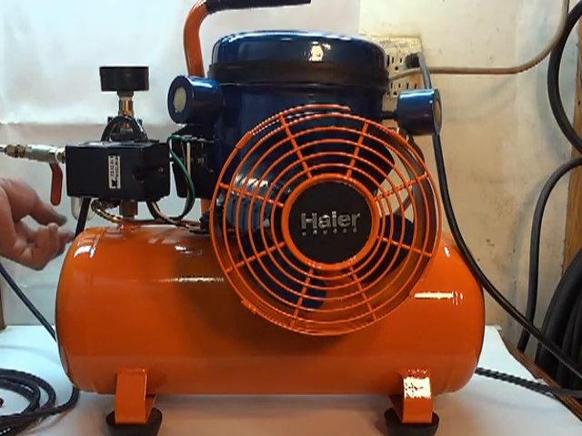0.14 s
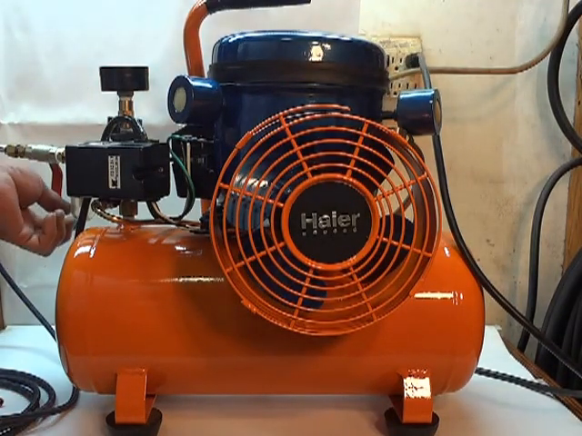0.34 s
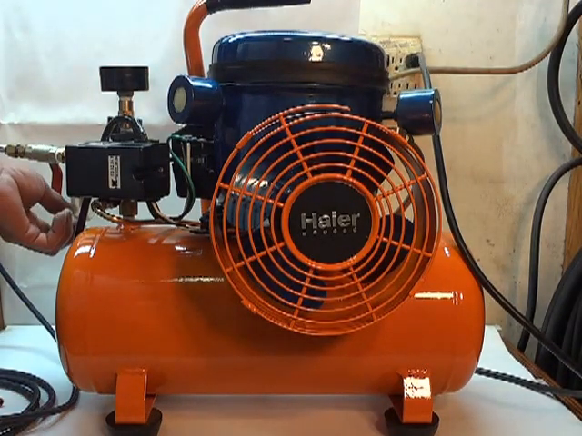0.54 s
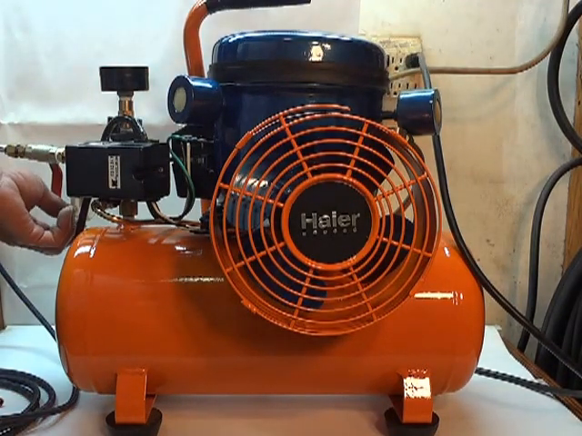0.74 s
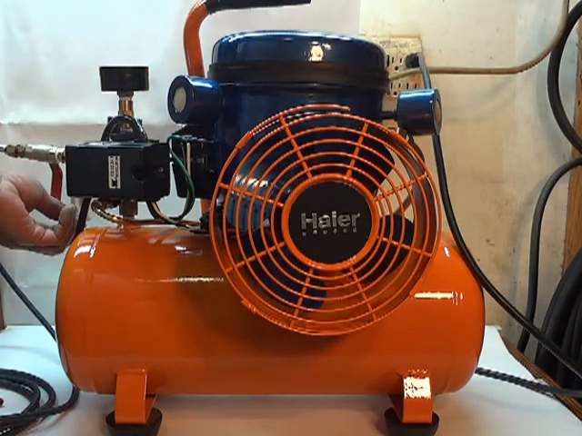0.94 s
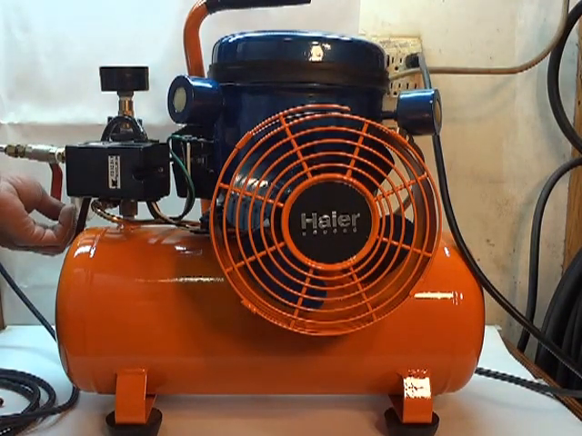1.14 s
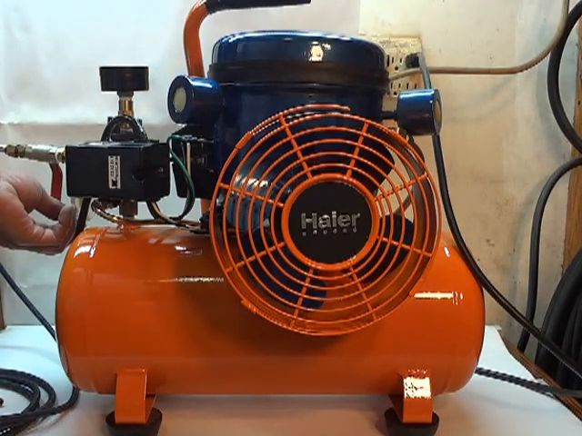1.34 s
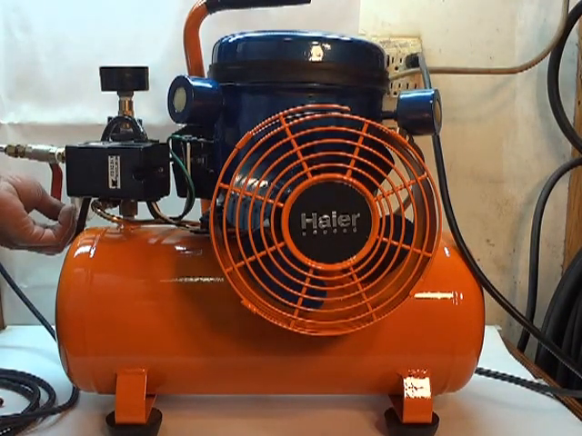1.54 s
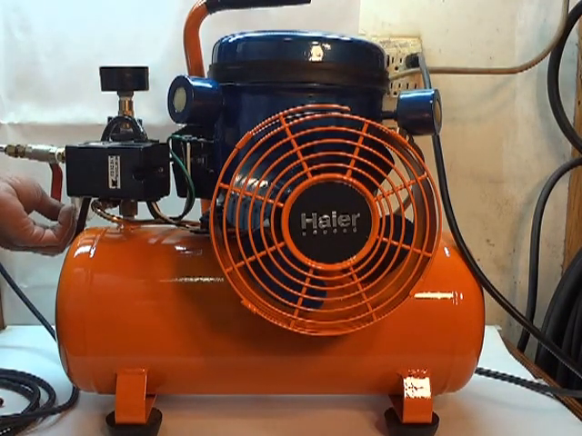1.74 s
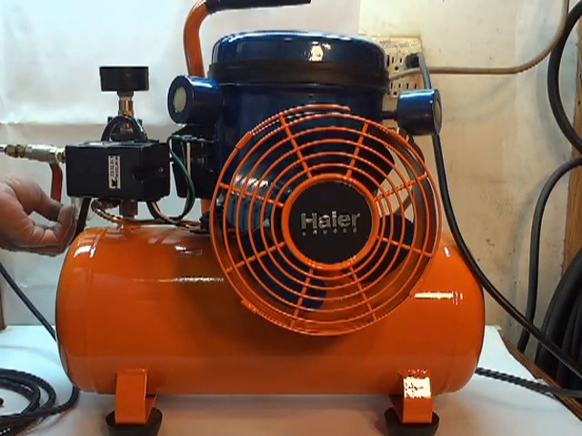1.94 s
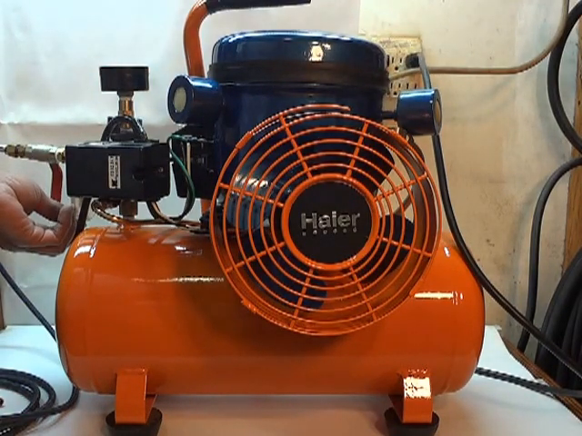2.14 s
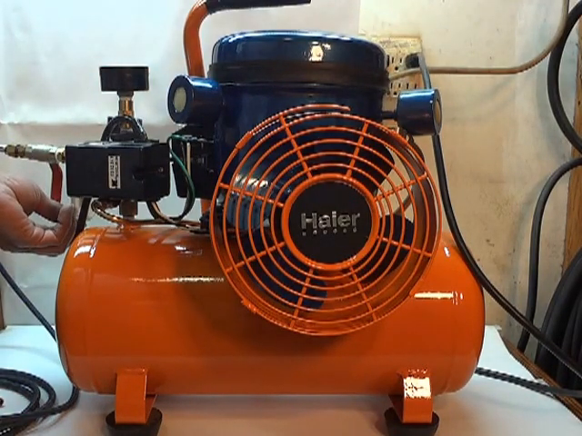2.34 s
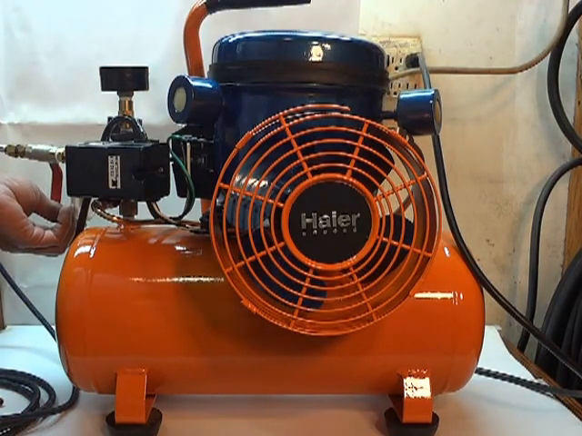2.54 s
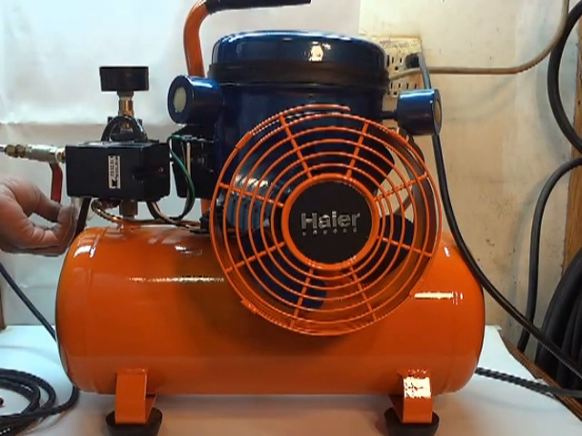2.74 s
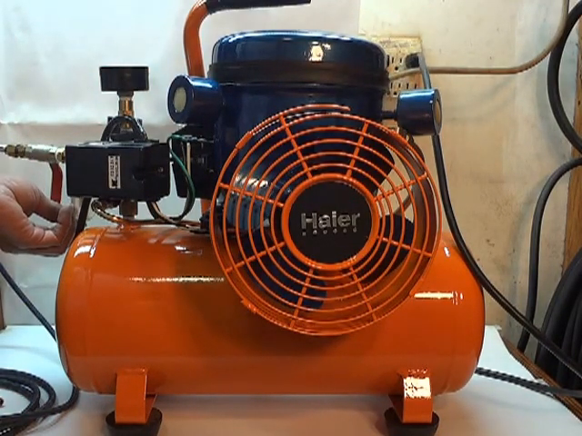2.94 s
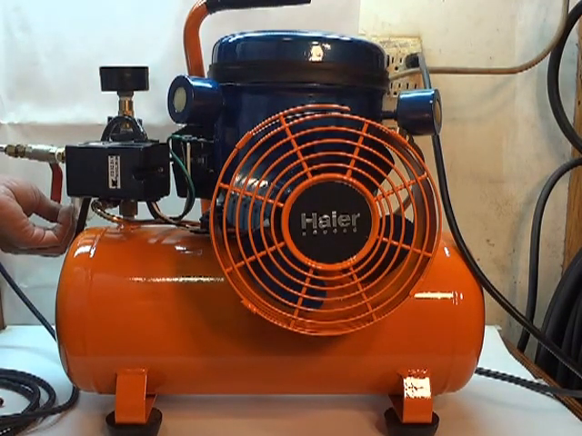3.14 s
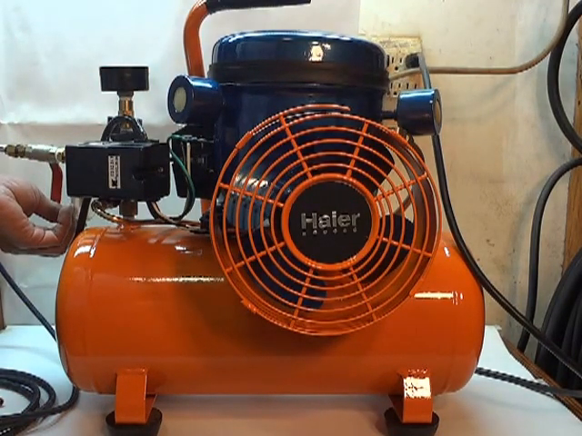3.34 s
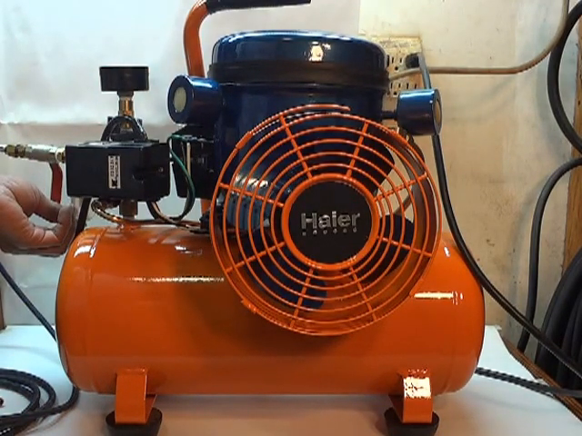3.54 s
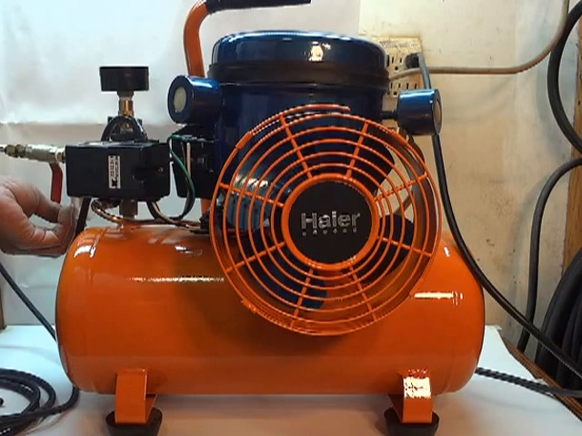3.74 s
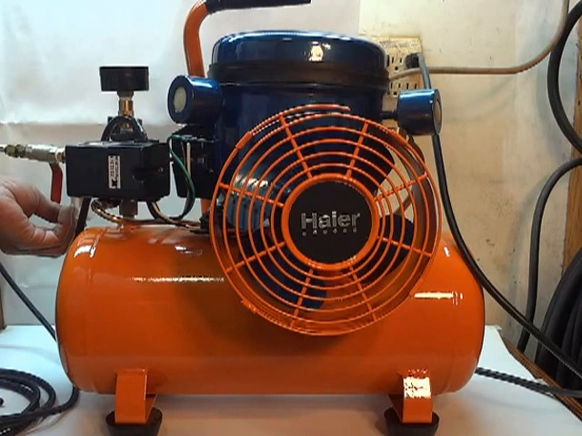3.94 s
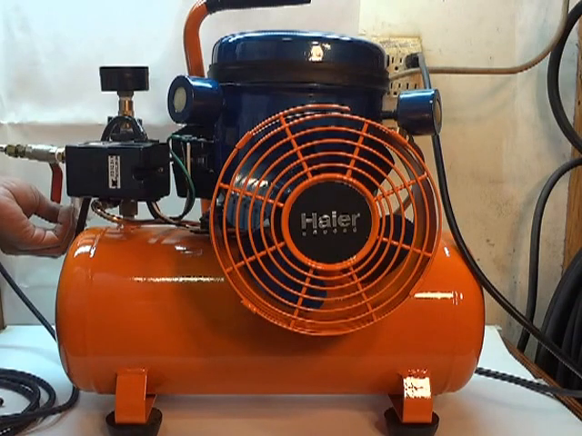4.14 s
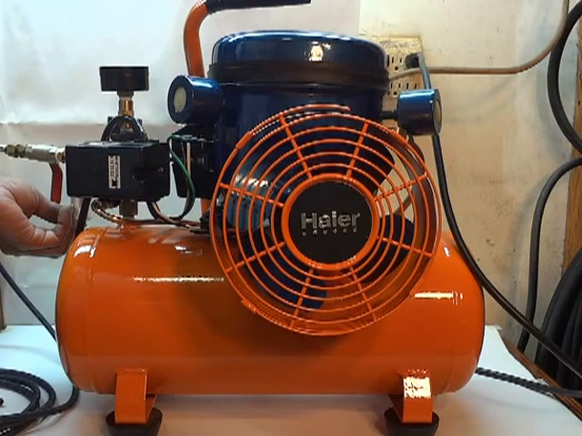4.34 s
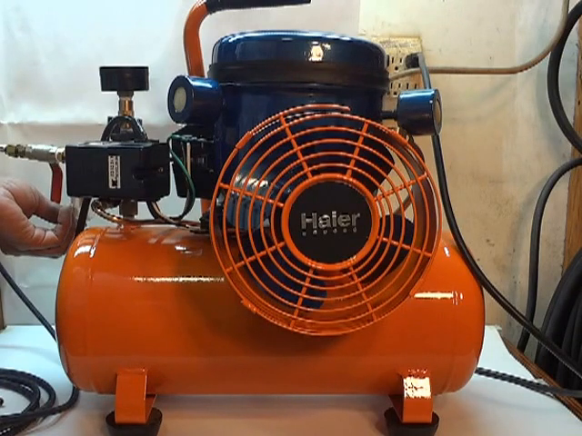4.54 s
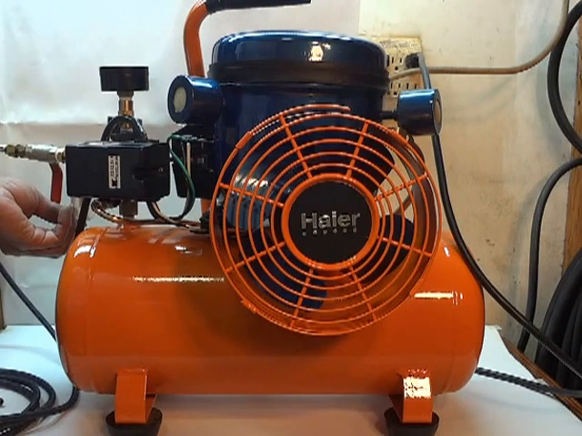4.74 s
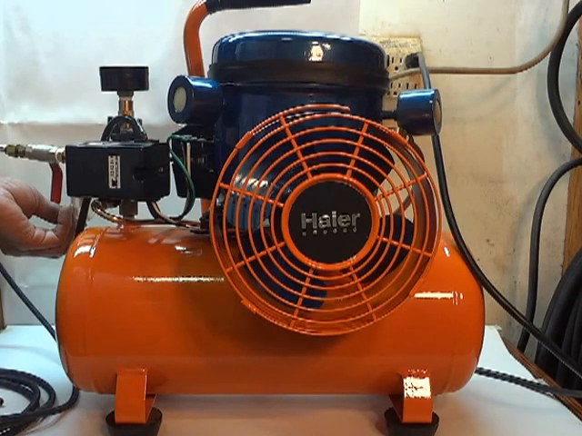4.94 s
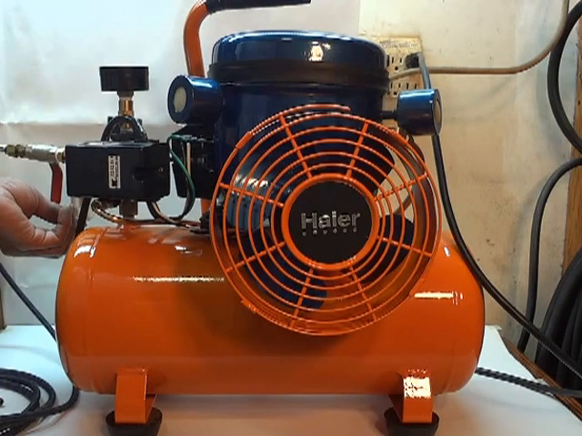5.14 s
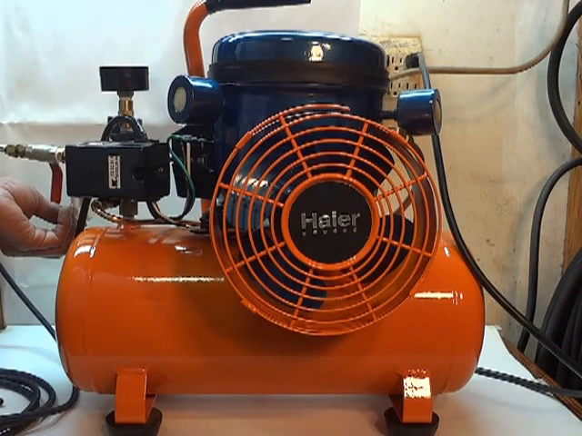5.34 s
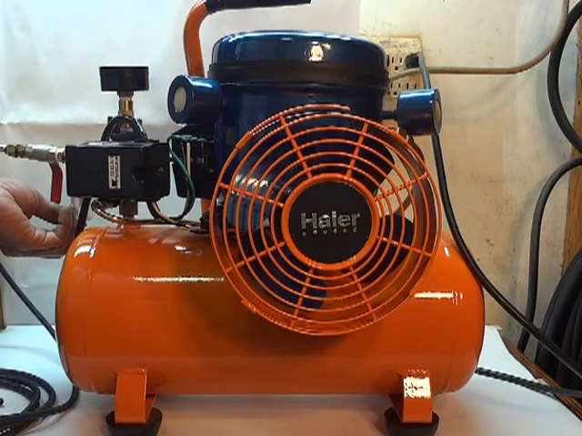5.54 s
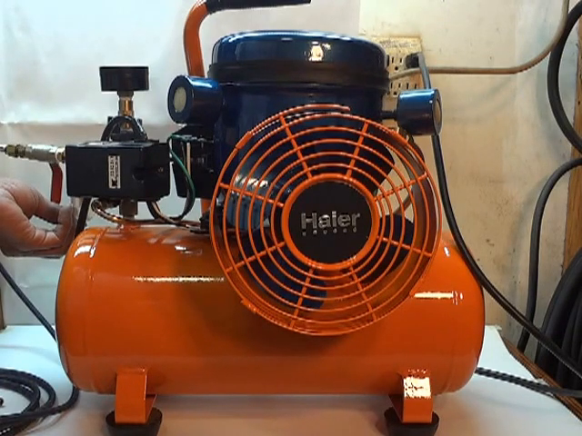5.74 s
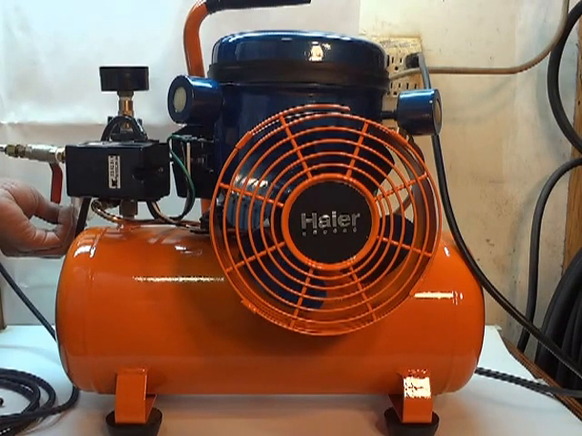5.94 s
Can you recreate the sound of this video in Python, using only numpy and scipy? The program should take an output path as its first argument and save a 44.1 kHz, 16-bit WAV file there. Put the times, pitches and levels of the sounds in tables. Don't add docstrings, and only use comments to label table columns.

```python
import sys
import numpy as np
from scipy import signal
from scipy.fft import rfft, irfft
from scipy.io import wavfile
from scipy.ndimage import uniform_filter1d, minimum_filter1d

SR = 44100
rng = np.random.default_rng(int(sys.argv[2]) if len(sys.argv) > 2 else 0)


def persist_wave(psi):
    counts = np.round(np.clip(psi, -1, 1) * 32767).astype(np.int16)
    wavfile.write(sys.argv[1], SR, np.atleast_2d(counts).T)


def ratio_of_db(decibels):
    return 10 ** (np.asarray(decibels, float) / 20)


N = 264159
HOP, SIZE = 256, 1024
TIME, HZ = np.arange(N) / SR, np.fft.rfftfreq(SIZE, 1 / SR)
FRAMES = np.arange(N // HOP + 5) * HOP / SR
FINE_HZ = np.fft.rfftfreq(N, 1 / SR)

OPEN_S, FILL_S = 1.055, 0.034
TURN_S = 1.774

# frequency in Hz, correlation from -1 to 1.
ROOM_SAME = [(60, 0.83), (140, 0.41), (350, -0.14), (840, -0.44), (2020, -0.2), (4880, 0.44), (11800, 0.75)]


def evened(x):
    return x / np.sqrt(np.mean(x ** 2) + 1e-20)


def read(points):
    f, value = np.transpose(points)
    return np.interp(np.log(HZ + 1), np.log(f + 1), value)[:, None]


def drift(hz, shape):
    white = rng.standard_normal(shape)
    return evened(signal.lfilter([1], [1, -np.exp(-2 * np.pi * hz / SR)], white))


def patches(bins, frames):
    chance = rng.standard_normal((len(FRAMES), len(HZ))).T
    across = uniform_filter1d(chance, size=bins, axis=0)
    return evened(uniform_filter1d(across, size=frames, axis=1))


def noise(field_db, same, lead=0):
    a, b, c, d = rng.standard_normal((len(FRAMES), len(HZ), 4)).T
    same = np.clip(same, -1, 1)
    left = a + 1j * b
    right = same * left + np.sqrt(1 - same ** 2) * (c + 1j * d)
    z = np.array([left * np.exp(1j * lead), right])
    return evened(signal.istft(z * ratio_of_db(field_db), nperseg=SIZE, noverlap=SIZE - HOP)[1][:, :N])


def ringing(modes, bins):
    return sum(ratio_of_db(db) ** 2 / (1 + (2 * (bins - hz) / width) ** 2) for hz, width, db in modes)


def resonant(x, modes):
    return evened(irfft(rfft(x) * np.sqrt(1 + ringing(modes, FINE_HZ)), N))


def tuned_noise(modes, apart):
    shared, left, right = rng.standard_normal((N, 3)).T
    ports = shared + apart * np.array([left, right])
    return evened(irfft(rfft(ports) * ringing(modes, FINE_HZ), N))


def settle(t, start_s, lag_s):
    return 1 - np.exp(-np.maximum(t - start_s, 0) / lag_s)


def bumps(rows):
    return sum(db * np.exp(-.5 * ((TIME - s) / width) ** 2) for s, db, width in rows)


def puff():
    # frequency in Hz, level in dB per Hz.
    puff_colour = [(59, -46), (100, -18), (207, -2.5), (611, -4), (715, -1), (1040, -5), (3250, -7),
                   (11000, -18.5), (14300, -49), (22000, -120)]
    start_db, t60_s = -50.5, 0.56
    return noise(read(puff_colour), read(ROOM_SAME)) * ratio_of_db(start_db - 60 * TIME / t60_s)


def room(waver_hz=3, patchy_db=1.5):
    # frequency in Hz, level in dB per Hz.
    air_colour = [(12, -39), (20, -25), (66, -16.5), (204, -9), (416, -7.5), (501, -6), (872, -9.5),
                  (1110, -8.5), (1330, -9.5), (1640, -13.5), (2570, -17.5), (3930, -22), (10200, -27.5),
                  (11000, -27), (14300, -71), (22000, -120)]
    # frequency in Hz, width in Hz, height in dB.
    duct = [(172, 8.5, 1.5), (351, 7, 2.5), (750, 18, 8.5), (1380, 44, 3), (2560, 60, 4.5), (3180, 60, 8),
            (10100, 60, 7)]
    # frequency in Hz, level in dB rms, wavering in dB.
    hum_lines = [(59.2, -76, 3.5), (123, -76.5, 1.5)]
    wash = noise(read(air_colour) + patchy_db * patches(6, 24), read(ROOM_SAME))
    air = ratio_of_db(-57.5) * resonant(wash, duct)
    hz, db, waver_db = np.transpose(hum_lines)[:, :, None]
    phase = 2 * np.pi * rng.random((len(hum_lines), 1))
    swell = ratio_of_db(db + waver_db * drift(waver_hz, (len(hum_lines), N)))
    hum = np.sqrt(2) * swell * np.sin(2 * np.pi * hz * TIME + phase)
    return air + hum.sum(0)


def rumble():
    # time in seconds, swell in dB, half width in seconds.
    lumps = [
        (.5, 1.5, .3),
        (1.55, 6, 0.23),
        (1.72, 5, .03),
        (1.9, 8, .04),
        (2.15, 3, .09),
        (2.6, -2, 0.33),
        (3.5, 0, 0.16),
        (4.5, -4, 0.48),
    ]
    bass = tuned_noise([(58, 22, -1.0), (30, 30, -1.5), (88, 45, -0.5)], 0.47)
    return bass * ratio_of_db(-70 + bumps(lumps))


def whine(hz=887, rms_db=-75):
    return np.sqrt(2) * ratio_of_db(rms_db) * np.sin(2 * np.pi * hz * TIME)


def leak():
    # frequency in Hz, width in Hz, level in dB.
    whistle_modes = [(6760, 99, 3), (6340, 250, -2), (7800, 120, -3)]
    start_db, rise_db_per_s, fall_db_per_s = -61, 110, 300
    rise_db = rise_db_per_s * (TIME - OPEN_S)
    fall_db = fall_db_per_s * (OPEN_S + FILL_S - TIME)
    creep_db = start_db + np.minimum(rise_db, fall_db)
    wisp_s, wisp_db, wisp_width_s = .66, -77, .07
    wisp = ratio_of_db(wisp_db) * np.exp(-.5 * ((TIME - wisp_s) / wisp_width_s) ** 2)
    return tuned_noise(whistle_modes, .3) * (ratio_of_db(creep_db) + wisp)


def opening(lag_s, delay_s=0):
    crack_share, first_share, first_lag_s = -0.58, 0.37, 0.035
    first = settle(FRAMES, OPEN_S, first_lag_s)
    wider = settle(FRAMES, TURN_S + delay_s, lag_s)
    return crack_share + (first_share - crack_share) * first + (1 - first_share) * wider


def jet(patchy_db=1.0, flutter_db=0.79, flutter_hz=40):
    # frequency in Hz, level in dB per Hz.
    turbulence = [(300, -37.5), (600, -27.5), (1100, -22.5), (1500, -27.5), (1680, -27), (1850, -19.5),
                  (2800, -21.5), (4000, -13.5), (5200, -8), (6000, -12.5), (7200, -9.5), (8500, 0.06),
                  (9800, -7.5), (11000, -5)]
    # frequency in Hz, gain in dB.
    shut_loss = [(1500, -7.5), (3000, -7.5), (5200, -7), (5700, -2), (6300, 0), (6500, 4), (6850, 2.5),
                 (7250, -4.5), (7540, 3), (7850, -5), (8500, -5.5), (9300, -4), (11000, -8.5)]
    # frequency in Hz, width in Hz, height above the jet in dB.
    valve_modes = [(1400, 147, 8), (2184, 350, 11.5), (2550, 115, 14), (2958, 147, 19), (3340, 300, 13),
                   (3520, 68, 15.5), (3867, 120, 13.5), (4412, 198, 14.5), (4730, 210, 9), (5080, 31, 8.5),
                   (5182, 25, -25), (5530, 120, 15), (5782, 163, 22), (6200, 110, 16.5), (6270, 47, 23.5),
                   (6500, 61, 19.5), (6830, 135, 20.5), (7210, 130, 14.5), (7575, 416, 16), (7940, 67, 15),
                   (8040, 41, 11.5), (9200, 25, -5), (8783, 26, -6.5), (9200, 110, 10), (9370, 64, 21.5),
                   (9840, 360, 17.5), (9900, 79, 11.5), (9950, 150, 20), (10400, 37, 25.5),
                   (10863, 350, 18.5)]
    # frequency in Hz, correlation from 0 to 1.
    jet_same = [(60, 0.96), (170, 0.32), (500, 0.057), (1420, 0.62), (4090, 0.89), (11800, 0.99)]
    # frequency in Hz, lead in rad.
    jet_lead = [(1000, -0.18), (1800, -0.38), (3300, -0.47), (11000, 0.27)]
    # time in seconds, change in dB, half width in seconds.
    surges = [
        (1.18, 0.3, 0.031),
        (1.95, 1.5, 0.029),
        (4.11, -1.4, 0.026),
        (4.75, 1.5, 0.017),
        (4.78, -1.2, 0.017),
        (5.39, 2.5, 0.012),
        (5.43, 0.6, .03),
        (5.55, 1, 0.034),
        (5.92, 0.9, .05),
    ]
    fizz = opening(0.12) - 0.021 * np.maximum(FRAMES - TURN_S, 0)
    body = opening(0.58, delay_s=0.17)
    share = np.where(HZ[:, None] > 7860, fizz, body)
    colour_db = read(turbulence) + read(shut_loss) * (1 - share)
    middle = (HZ > 5400) & (HZ < 7800)
    steady_db = 10 * np.log10(np.mean(ratio_of_db(colour_db[middle]) ** 2, 0))
    field_db = colour_db - steady_db + patchy_db * patches(20, 8)
    hiss = resonant(noise(field_db, read(jet_same), read(jet_lead)), valve_modes)
    start = settle(TIME, OPEN_S, FILL_S) ** 1.68
    return hiss * start * ratio_of_db(-25 + bumps(surges) + flutter_db * drift(flutter_hz, N))


def walls(x, t60=0.38, wet_db=-8, apart=0.77):
    t = np.arange(SR // 2) / SR
    shared, left, right = rng.standard_normal((len(t), 3)).T
    tail = (shared + apart * np.array([left, right])) * ratio_of_db(-60 * t / t60) * (t > .004)
    tail = ratio_of_db(wet_db) * tail / np.linalg.norm(tail[0])
    wet = signal.fftconvolve(x, tail, axes=1)[:, :N]
    return (x + wet) / np.sqrt(1 + ratio_of_db(wet_db) ** 2)


def ducking():
    sink_db = -7 * settle(TIME, 2.06, 0.17)
    ease_db = 4 * settle(TIME, 2.47, 0.65)
    return ratio_of_db(sink_db + ease_db)


def scene():
    hiss = walls(jet()) * ratio_of_db([[.1], [-.1]])
    return hiss + leak() + puff() + ducking() * (room() + rumble()) + whine()


def starved(x, under_db=-51.5, dip_db=-3.8, low_hz=120, top_hz=2600):
    size, width = 3072, 6
    ms = np.array([x[0] + x[1], x[0] - x[1]]) / 2
    z = signal.stft(ms, window="cosine", nperseg=size, noverlap=size // 2)[2]
    band = (abs(z[:, :-1]) ** 2).reshape(2, -1, width, z.shape[2]).sum(2)
    usual = uniform_filter1d(uniform_filter1d(band, size=3, axis=1), size=9, axis=2)
    loud = minimum_filter1d(band[0].sum(0), size=5)
    dropped = band < np.minimum(loud * ratio_of_db(under_db) ** 2, usual * ratio_of_db(dip_db) ** 2)
    hz = np.arange(band.shape[1])[:, None] * width * SR / size
    keep = np.repeat(1 - dropped * (hz > low_hz) * (hz < top_hz), width, axis=1)
    kept = z * np.pad(keep, ((0, 0), (0, 1), (0, 0)), "edge")
    mid, side = signal.istft(kept, window="cosine", nperseg=size, noverlap=size // 2)[1][:, :N]
    return np.array([mid + side, mid - side])


def low_pass(x):
    return signal.sosfilt(signal.butter(12, 12360, fs=SR, output="sos"), x)


def record(dry):
    overloaded = .6 * np.tanh(dry / 0.58)
    edge = signal.firwin(1601, 11010, window=("kaiser", 7), fs=SR)
    mix = signal.oaconvolve(starved(overloaded), edge[None], "same", axes=1)
    return low_pass(mix)


dry = scene()
out = record(dry)
persist_wave(out)
```